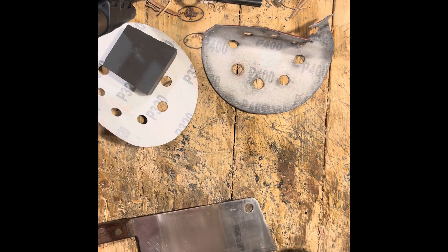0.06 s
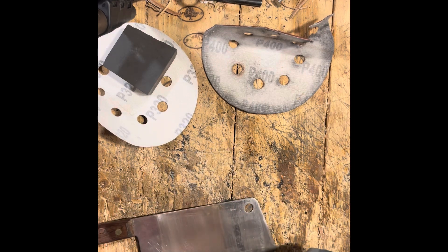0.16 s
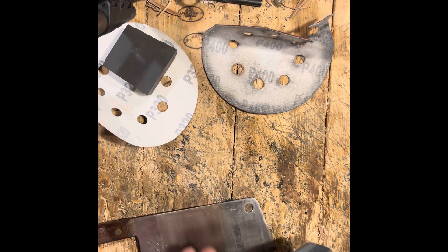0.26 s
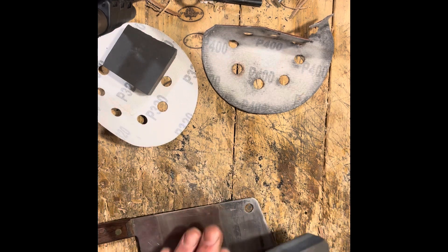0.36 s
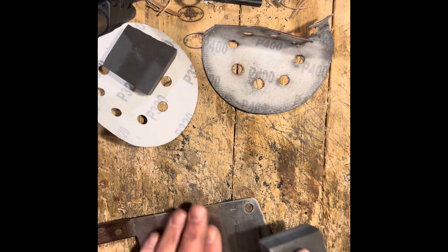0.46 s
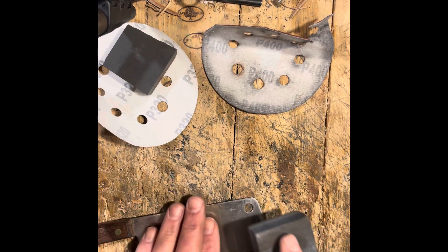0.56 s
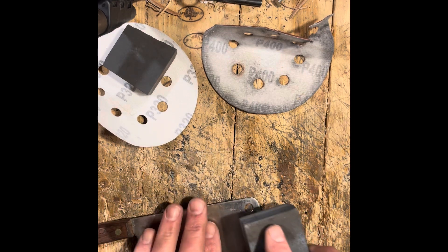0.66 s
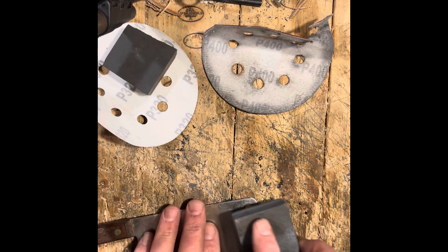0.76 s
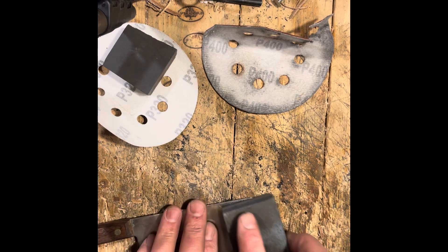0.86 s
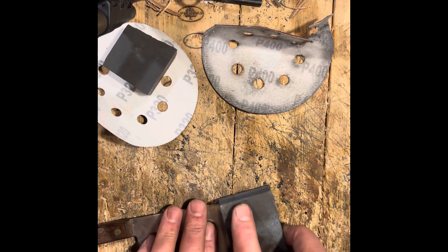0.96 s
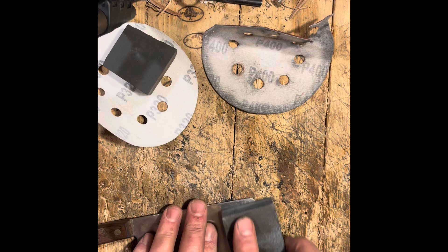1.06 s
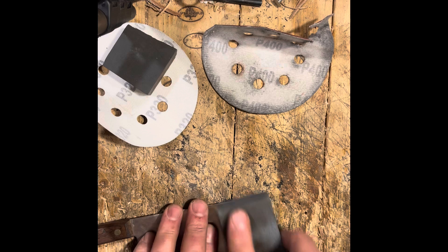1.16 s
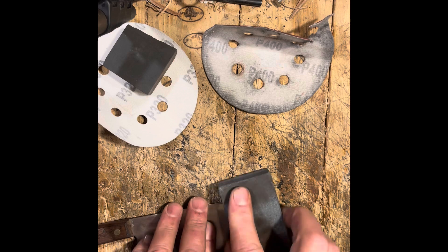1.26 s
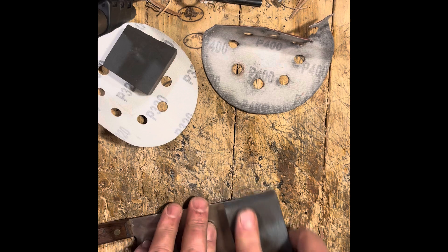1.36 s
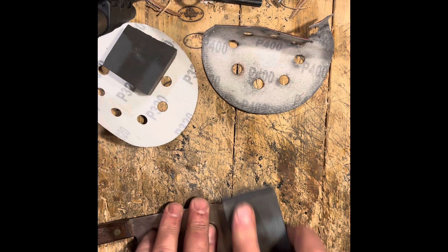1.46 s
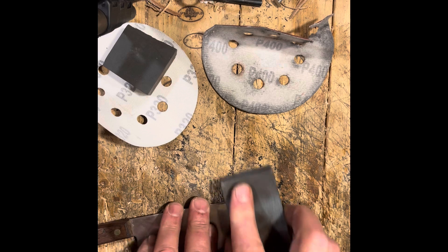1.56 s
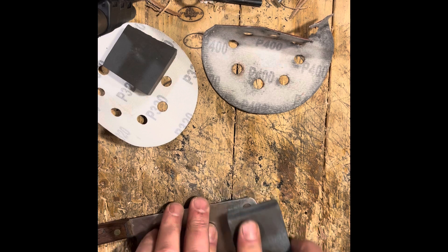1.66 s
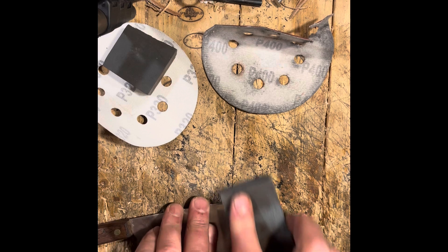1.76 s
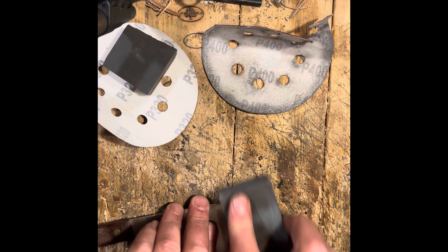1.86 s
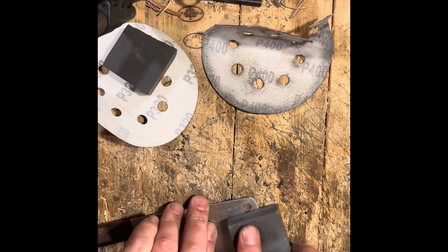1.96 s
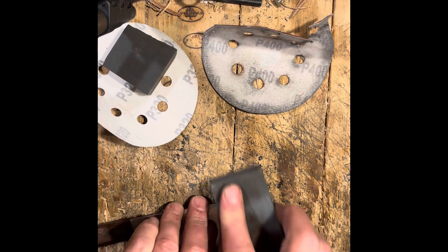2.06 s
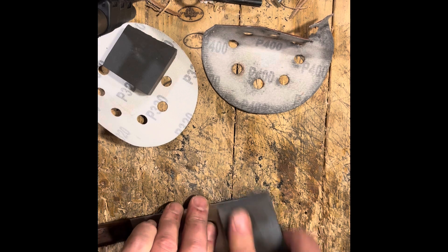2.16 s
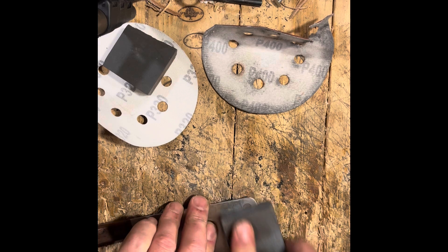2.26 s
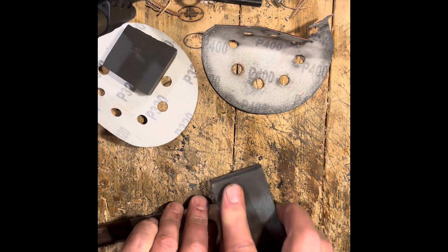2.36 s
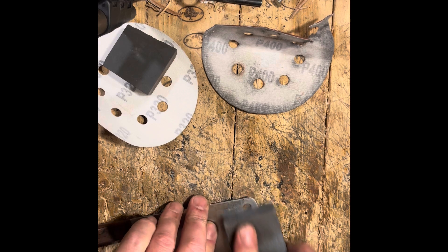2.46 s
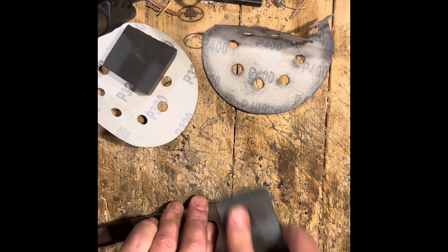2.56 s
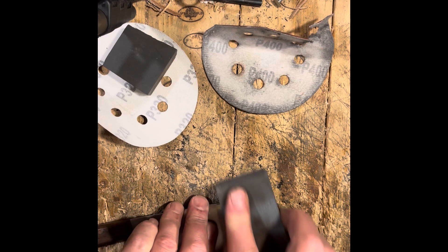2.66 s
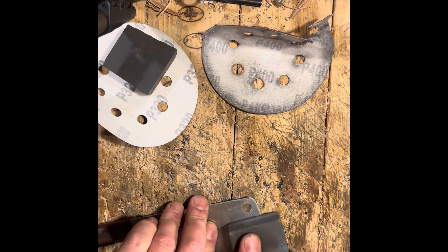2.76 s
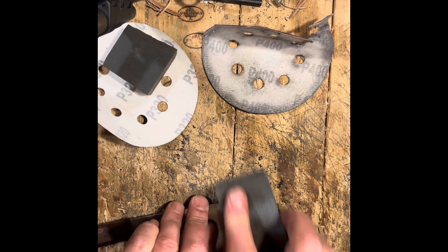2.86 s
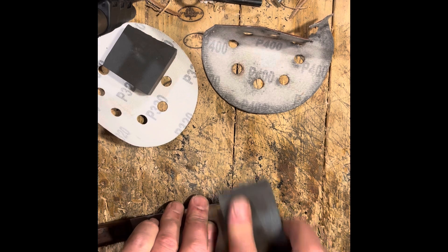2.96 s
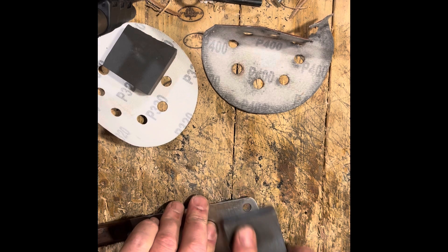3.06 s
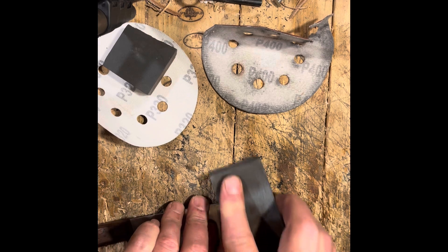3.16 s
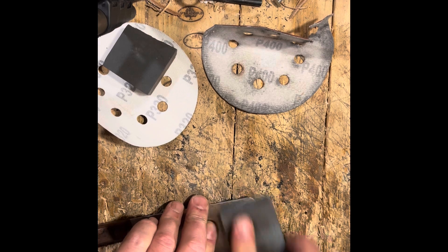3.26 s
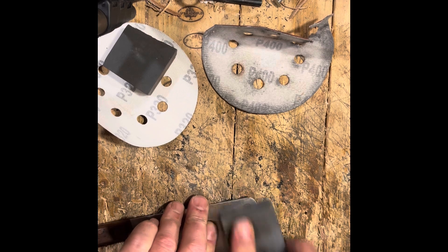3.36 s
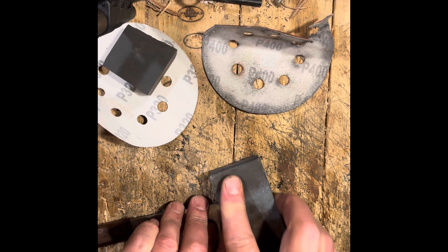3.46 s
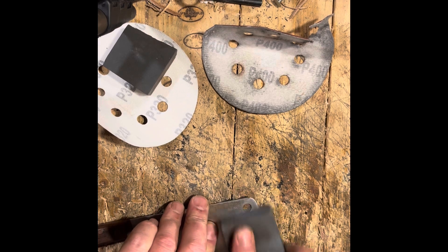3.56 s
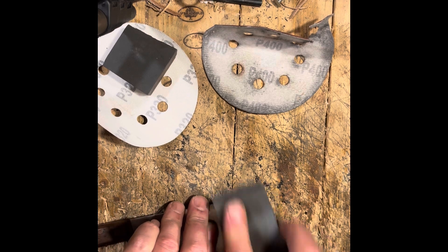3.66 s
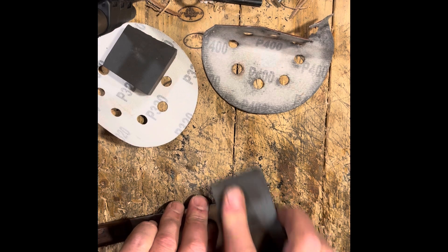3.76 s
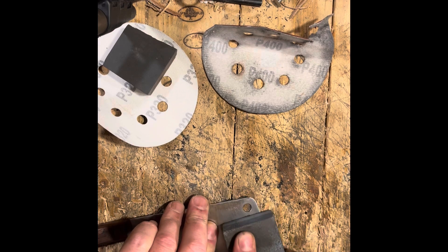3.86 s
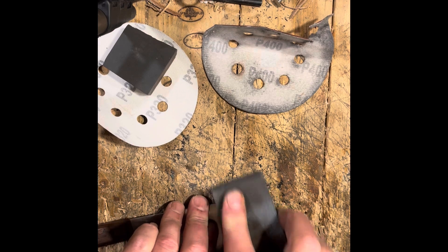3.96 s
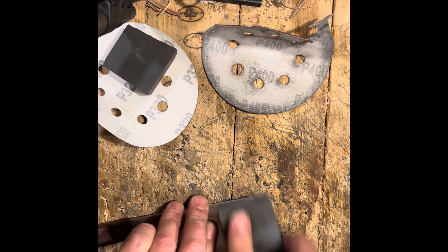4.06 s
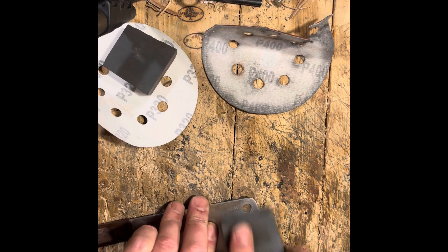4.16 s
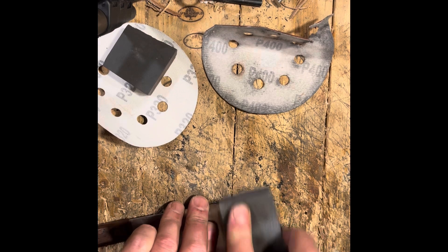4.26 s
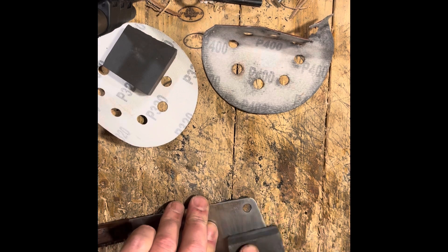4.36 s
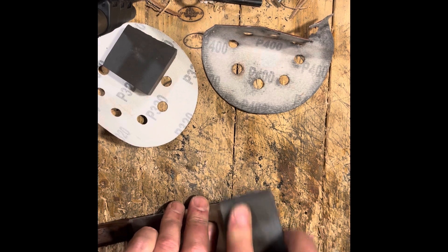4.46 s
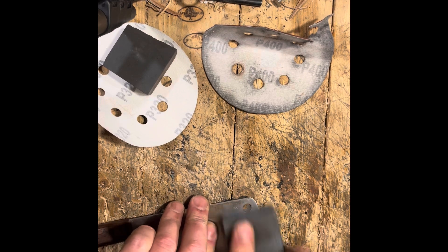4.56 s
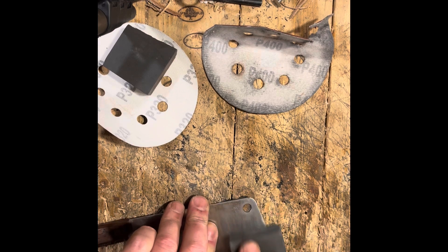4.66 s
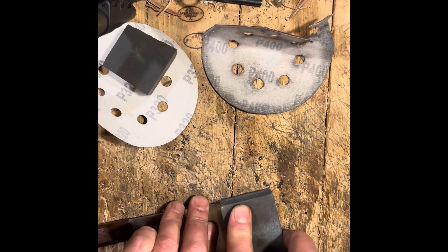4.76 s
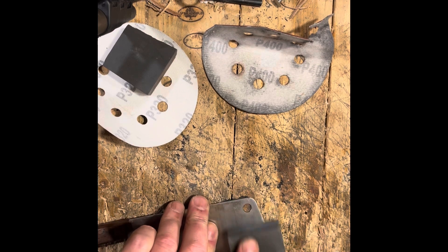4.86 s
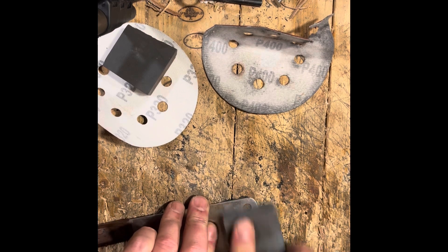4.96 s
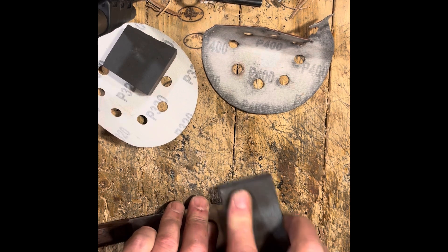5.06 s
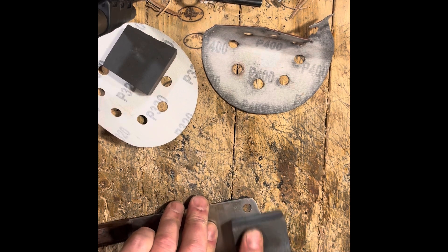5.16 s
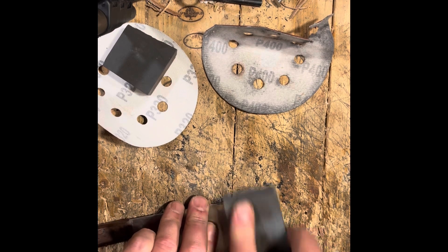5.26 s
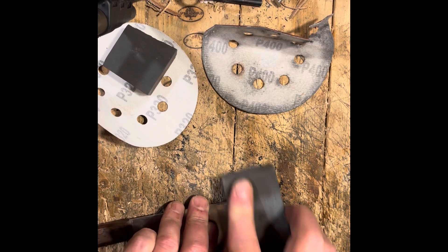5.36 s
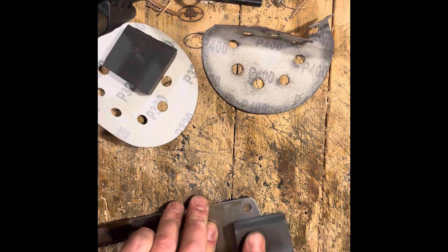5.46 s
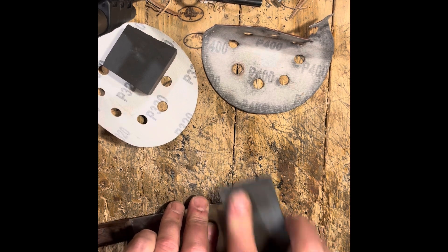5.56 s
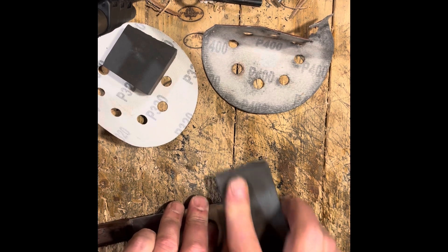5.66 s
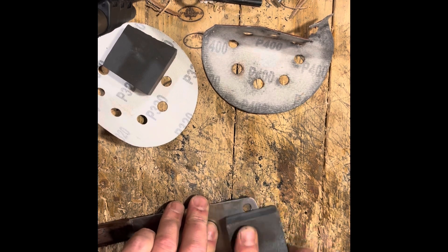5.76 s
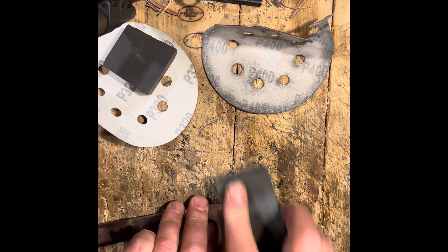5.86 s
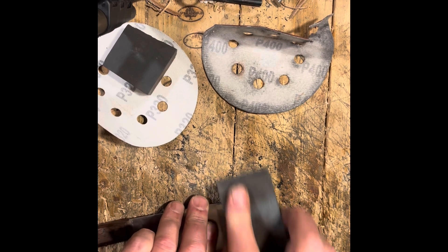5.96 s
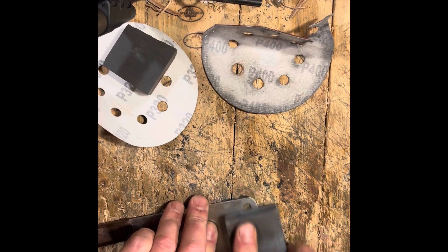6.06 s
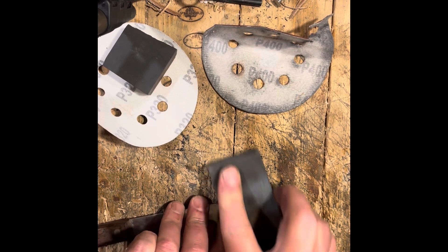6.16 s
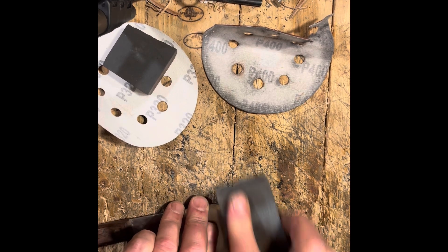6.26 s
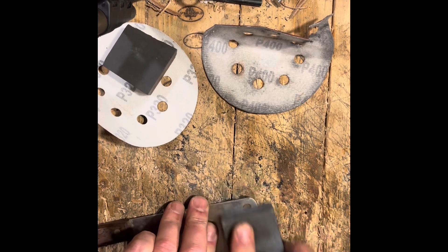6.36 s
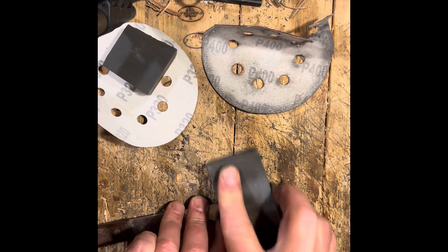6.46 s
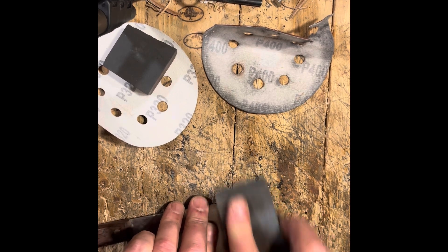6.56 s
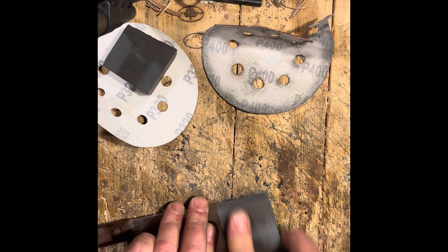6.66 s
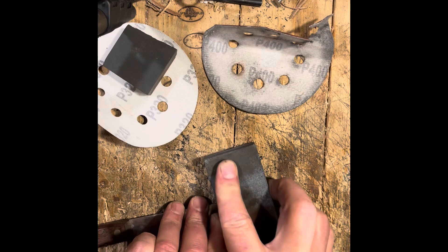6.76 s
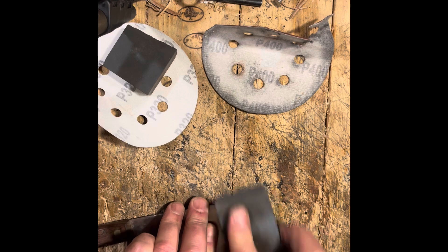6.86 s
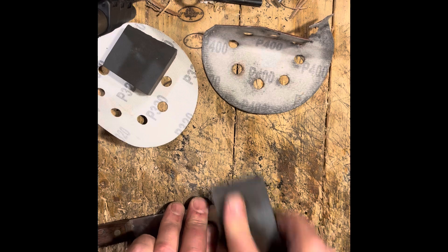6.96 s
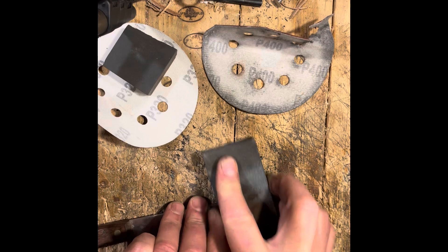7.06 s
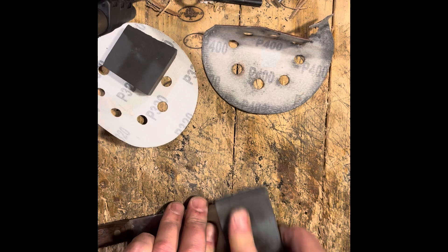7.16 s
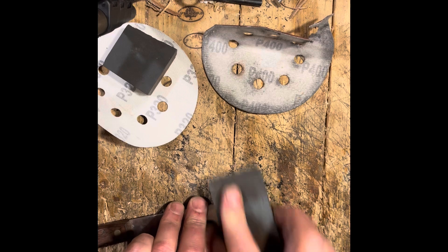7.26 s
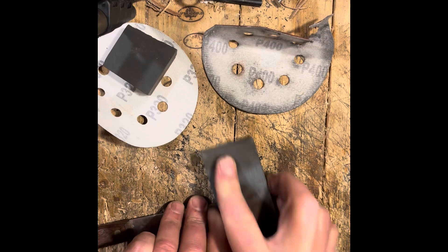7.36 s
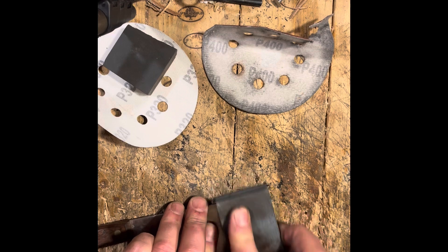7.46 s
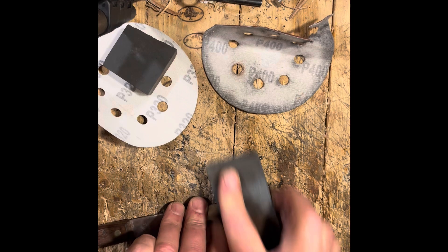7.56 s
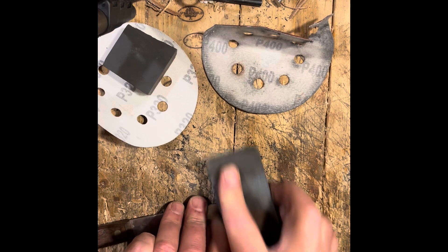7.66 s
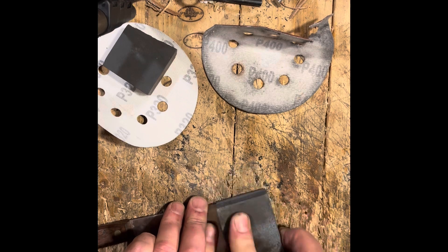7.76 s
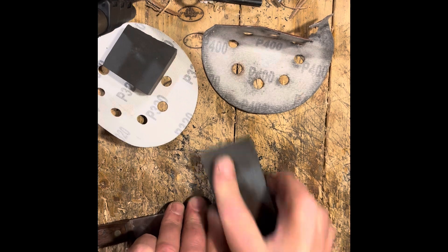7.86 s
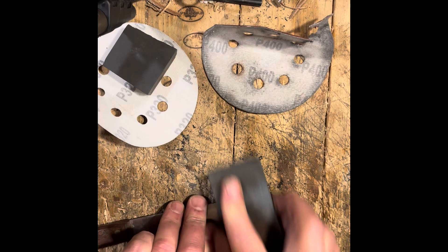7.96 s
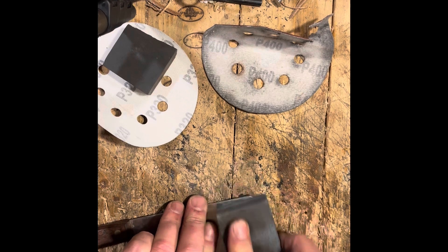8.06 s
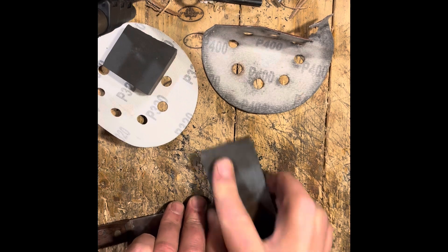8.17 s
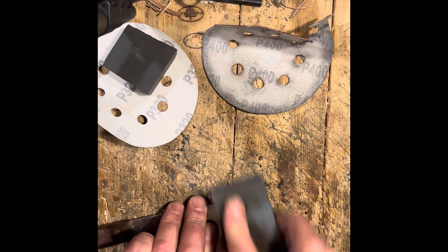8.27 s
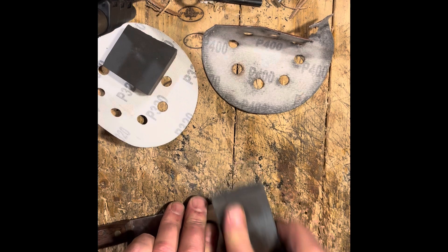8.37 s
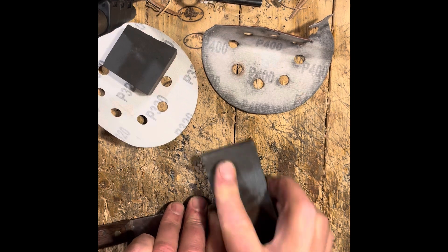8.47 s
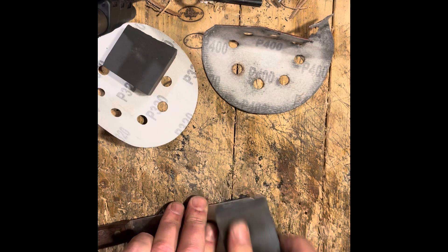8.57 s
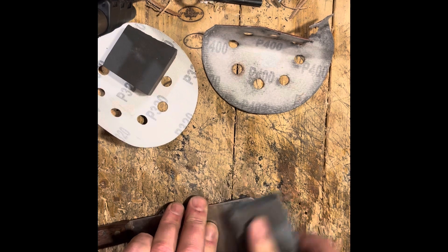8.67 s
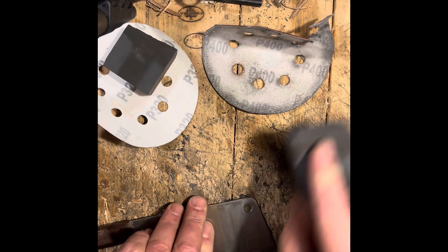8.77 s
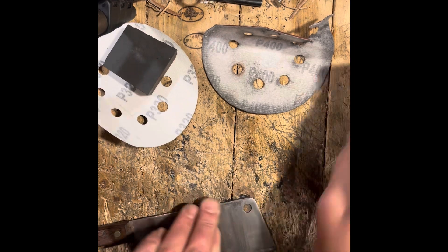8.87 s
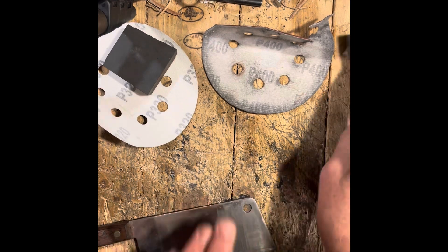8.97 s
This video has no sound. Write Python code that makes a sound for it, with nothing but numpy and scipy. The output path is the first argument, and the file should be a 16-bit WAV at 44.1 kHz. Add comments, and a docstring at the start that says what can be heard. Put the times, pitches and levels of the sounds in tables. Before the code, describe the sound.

In a quiet workshop, a faint far tap rings, then soft handling and a brush of skin. A gritty stone clacks onto a steel blade and scrubs quickly back and forth, hissing with every stroke over a dull bench rumble, with scattered clinks and ticks. The stone lifts, there is a short quiet gap, then skin slides and it lands with a hard wooden clunk. Close stereo phone pickup, dry room.

```python
"""Heard close above a wooden workbench, in two channels, as by a phone: first a far tap rings in the shop,
then light contacts and a slide of skin. A gritty stone is rubbed to and fro on a steel blade that lies on the bench:
grit hisses with the speed of each stroke, the blade rings, rocks and knocks, bright ticks fall, the bench rumbles.
At the end the stone leaves the blade, skin slides and the stone is put down hard. Quiet shop air lies beneath.
Grit is random slips, steel and wood are decaying modes or resonances, the rest is shaped noise."""
import sys
import numpy as np
from scipy import signal
from scipy.fft import rfft, irfft, next_fast_len
from scipy.io import wavfile
from scipy.ndimage import uniform_filter1d, map_coordinates

SR = 44100
rng = np.random.default_rng(int(sys.argv[2]) if len(sys.argv) > 2 else 0)


def generate_wav(sig):
    """Save sig (samples, or channels by samples) to the path in sys.argv[1] as 16-bit PCM at SR."""
    pcm = np.round(np.clip(np.atleast_2d(sig).T, -1, 1) * 32767).astype(np.int16)
    wavfile.write(sys.argv[1], SR, pcm)


N = 398223

# Levels in the tables are relative: each source adds its own gain.
# The strokes of the stone. Each row: turn in seconds, share of the stroke before top speed (held to 0.2-0.8),
# top hiss in dB, rising and falling shoulder in dB re that top, blade ring in dB, bench in dB.
STROKES = [(0.848, 0.17, -36, 9, 0.5, -41, -36), (0.942, 0.15, -30.5, -4, -6, -36.5, -50),
           (1.077, 0.43, -26.5, -5, -7, -34, -45.5), (1.242, 0.52, -29.5, -6.5, -9, -37, -50.5),
           (1.392, 1, -31.5, -5, -4, -35.5, -49.5), (1.518, 0.35, -32, -6, -7.5, -36.5, -45.5),
           (1.667, 0.67, -33.5, -8, -14, -40.5, -49.5), (1.795, 0.25, -30.5, -10, -9, -36.5, -44),
           (1.936, 0.55, -29.5, -9.5, -4.5, -37.5, -41), (2.069, 0.58, -28.5, -4, -7, -36, -42.5),
           (2.203, 0.73, -31.5, -5.5, -9, -38.5, -43), (2.342, 0.24, -30.5, -5.0, -3.5, -39, -42),
           (2.474, 0.67, -31.5, -9.5, -5, -38.5, -41), (2.613, 0.35, -30, -6.5, -8.5, -37.5, -43.5),
           (2.747, 0.6, -32, -9, -7.5, -36, -41), (2.888, 0.21, -29.5, -9, -8, -35.5, -41),
           (3.019, 0.58, -32, -6.5, -11.5, -36, -47), (3.157, 0.27, -29.5, -12.5, -6.5, -36, -40),
           (3.301, 0.66, -31.5, -3.5, -8.0, -38, -37), (3.439, 0.37, -30.5, -4.5, -8, -36.5, -39),
           (3.574, 0.64, -34, -4, -8.5, -38, -40), (3.711, 0.28, -30, -4.5, -6.5, -38.5, -43.5),
           (3.843, 1, -36.5, -2, -3, -38.5, -46), (3.976, 0.2, -29.5, -9, -10, -35.5, -43.5),
           (4.124, 0.87, -38.5, -3.5, -3, -44, -54), (4.255, 0.53, -34, -2.5, -5, -43.5, -51),
           (4.38, 1, -42.5, -5.5, -6, -46, -61), (4.515, 0.5, -36, -5, -5.5, -42, -54),
           (4.656, 0.84, -40.5, -5, -6, -45, -55), (4.785, 0.62, -35.5, -3.5, -5, -43, -47.5),
           (4.913, 0.67, -34, -7.5, -4, -40.5, -46), (5.063, 0.18, -34.5, 1.5, -8, -41, -43),
           (5.201, 0.68, -35, -7.5, -9, -41, -42.5), (5.354, 0.3, -32.5, -15, -9.5, -38, -46.5),
           (5.492, 0.58, -33, -11, -5.5, -42, -45), (5.642, 0.47, -32.5, -7.5, -7, -37.5, -43),
           (5.789, 0.65, -32, -8.5, -14, -36, -40), (5.922, 0.51, -32, -10, -4.5, -39, -41),
           (6.064, 0.45, -33.5, -7.5, -8, -37.5, -41.5), (6.207, 0.35, -30.5, -6.5, -5.5, -37, -41.5),
           (6.359, 0.63, -32, -7.5, -7, -36, -46), (6.501, 0.48, -30, -8, -9, -36.5, -39),
           (6.644, 0.51, -32.5, -6, -8.5, -37, -44), (6.783, 0.47, -30.5, -14, -6.5, -37, -40.5),
           (6.924, 0.48, -32, -6, -8.5, -37, -42), (7.063, 0.58, -32.5, -4, -4.5, -38, -43.5),
           (7.214, 0.46, -34, -3.5, -5.5, -39.5, -45), (7.362, 1, -34, -0.5, -6.5, -42.5, -43.5),
           (7.502, 0.34, -34, -6.5, -3, -38.5, -41.5), (7.634, 0.63, -32.5, -4, -10, -39.5, -40.5),
           (7.785, 0.43, -33.5, -3, -5.5, -38, -45), (7.915, 0.72, -32, -2.5, -3, -38.5, -44),
           (8.062, 0.64, -35, -1, -5, -39.5, -44), (8.199, 0.7, -32.5, -6, -5.5, -39.5, -43),
           (8.339, 0.47, -34, -5.5, -12, -38.5, -41.5), (8.474, 0.5, -32, -5, -3.5, -38.5, -42.5),
           (8.626, 0.34, -37, -1, -5, -44, -62)]
# Coarse grains catch less as the surfaces wear in. Each row: time in seconds, catch size in dB re steady grit.
COARSE_GRIT = [(.85, -4), (2.5, -9), (8.7, -9)]
# Colour of the hissing grit. Each row: frequency in Hz, level in dB.
HISS_COLOUR = [(1000, -30), (2500, -15), (5000, -9), (7000, -5), (7800, -7), (8600, -5), (9200, 1),
               (9800, -5), (10400, -3), (11500, -9), (12600, -20), (13800, -39), (16000, -54)]
# Resonances of the rubbed blade. Each row: frequency in Hz, width in Hz, level in dB.
BLADE_RESONANCES = [(450, 234, -2.5), (554, 138, 3), (902, 167, 8), (931, 59, 10), (1170, 43, -19),
                    (1472, 82, 1.5), (1718, 130, 0), (2130, 226, 0), (2553, 390, 2.5), (2884, 790, -1)]
LIFT_S = 8.667  # the stone leaves the blade
TURN_DB, HALT_DB = -55, -17.5  # re the stroke's top: at a turn, and as the stone halts just before it
RISEN, BRAKES, HALTS = 0.16, 0.85, 0.96  # shares of a stroke: first shoulder, second shoulder, halt
CATCH_S = 0.0036  # time scale in which a caught grain tears loose
BRIGHTENS, TREBLE_HZ = 1.41, 9900  # hiss above this pitch grows with this power of the speed

# Steel or stone meets wood. Each row: time in seconds, clink in dB, thud and knock in dB re the clink.
KNOCKS = [(0.514, -54, 7.5, 4), (0.661, -49, 6, 1.5), (.689, -51.5, 11, -5), (0.8497, -18, 0, -4.5),
          (0.8582, -35, 2, -3), (1.1887, -22.5, -1, -9), (2.4236, -20, -34, -41), (2.43, -22, -30, -30),
          (2.7552, -23, 1, -7.5), (3.097, -38, 10, 1), (3.165, -24.5, 5.5, -8), (3.3063, -18, -5.5, -5.5),
          (3.3267, -26.5, 8.5, 4.5), (3.7423, -30, 2.5, -19), (3.9971, -23.5, -10, -20),
          (4.2072, -22, -5.5, -13), (4.284, -18.5, -9, -14.5), (4.469, -35, 10.5, -3),
          (4.5416, -17.5, -6.5, -6.5), (4.751, -30.5, 0, -9), (4.7894, -20, -6.5, -12),
          (5.5021, -12.5, -9, -16), (5.524, -20, -4.5, -14), (5.5968, -33, 6.5, -14),
          (5.9316, -23, -1.5, -14), (6.1467, -26.5, 1.5, -9), (6.4432, -23, -2, -12),
          (6.717, -35.5, 6.5, 2), (6.7919, -18, 0.5, -7.5), (7.3646, -34.5, 7, 1), (7.7772, -24.5, 0, 3),
          (7.8796, -29.5, 6, -2.5), (7.919, -24.5, -14, -17), (8.0709, -14.5, -5.5, -1),
          (8.208, -22.5, 1, -11), (8.902, -56, 10.5, -5), (8.9457, -27, 18.5, 8.5),
          (8.9603, -17, 18.5, 5.5), (8.973, -13.5, -10, 1.5), (8.9804, -14, -15, -4),
          (8.9947, -19.5, -18, -11), (9.0168, -22, 2, 7)]
# Bright ticks, some on top of a knock. Each row: time in seconds, level in dB.
BRIGHT_TICKS = [(0.554, -34), (0.8742, -12), (0.9555, -22), (0.9614, -17.5), (1.1335, -19), (1.459, -19),
                (1.524, -31), (1.547, -24), (1.8103, -29), (3.3065, -18.5), (3.993, -34), (4.0104, -19),
                (4.2833, -24.5), (4.54, -27), (5.077, -28), (5.38, -27), (5.395, -21), (6.7912, -23),
                (8.6005, -18)]
# Modes of the struck steel. Each row: frequency in Hz, level in dB, t60 in seconds.
CLINK_MODES = [(1450, -6, .02), (1745, -4, .022), (2060, 0, .025), (2400, -3, .02), (2950, -4, .02),
               (3600, -4, .018)]
# Low, then higher modes of blade and bench top. Each row: frequency in Hz, level in dB, free t60 in seconds.
THUD_MODES = [(169, -0.5, 0.11), (190.6, 0, 0.081), (248.3, 1, 0.085), (313, -3, 0.073), (390, -9, 0.11),
              (455, -16.5, 0.14)]
KNOCK_MODES = [(589, -3.5, 0.06), (632, -4, 0.062), (779, 0, 0.03), (964, -9, 0.051), (1036, -4, 0.014),
               (1220, -17.5, 0.036)]
# The same for the bench top under the loose stone. Each row: frequency in Hz, level in dB, t60 in seconds.
LANDING_THUD_MODES = [(165, 0, .14), (219, -1, .065), (290, -3, .055), (345, -7, .05), (430, -12, .05)]
LANDING_KNOCK_MODES = [(540, -9, .04), (600, -4, .045), (662, 0, .06), (790, -7, .045), (905, -9, .05),
                       (1050, -9, .05), (1190, -12, .05)]
KNOCK_TICK_DB = -18  # the tick of a knock re its clink
TICK_CLINK_DB = -6.5  # how much a bright tick rings the steel, re the tick
HELD = 0.32  # share of the ring time left while the hands press the blade
THUD_RISE_S = 0.0025  # the heavy bench top takes a while to swing
ROCK_DB, ROCK_SCATTER_DB, ROCK_EARLY_S = -38, 3, 0.006  # blade tips at a turn: mean peak, spread, lead on the turn

# Low rumble of the bench under the strokes and at the landing. Each row: time in seconds, level in dB.
RUMBLE_LEVEL = [(0, -75), (.84, -71), (.86, -52.5), (.93, -41), (1.0, -62), (2.1, -55), (3.35, -47),
                (3.9, -54), (5.45, -54), (5.56, -45.5), (5.7, -52.5), (7.3, -54), (8.2, -49.5), (8.63, -58),
                (8.7, -69), (8.94, -63), (8.97, -42)]
# Colour of that rumble. Each row: frequency in Hz, level in dB.
RUMBLE_COLOUR = [(20, -43), (45, -2), (80, 2.5), (115, 0.5), (150, -9), (300, -64)]
# Drone of the bench top under the stone. Each row: frequency in Hz, level in dB.
BOARD_COLOUR = [(100, -47), (170, -18.5), (250, 0.5), (330, -12), (390, 2), (470, -20), (700, -59)]

# The far tap. One row: start in seconds, level in dB, pitch in Hz at first, pitch in Hz in the tail,
# width in Hz, t60 of the shop in seconds.
FAR_TAP = (.151, -43, 1830, 1690, 85, 1.2)

# Skin slides on wood or steel. Each row: start in seconds, level in dB, t60 in seconds.
SKIN_SLIDES = [(.775, -53.5, 0.89), (8.899, -41, 0.49), (8.96, -26, 0.1)]
# Colour of skin on wood and steel. Each row: frequency in Hz, level in dB.
SKIN_COLOUR = [(60, -4), (300, 4), (700, 5.5), (2000, 1), (5000, 0), (9000, 10.5), (13000, -12)]
SLIDE_RISE_S = 0.0057
# The quiet air of the shop. Each row: time in seconds, level in dB.
AIR_LEVEL = [(0, -81), (.05, -61.5), (.7, -64.5), (8.675, -59.5), (8.89, -65)]
# Colour of that air. Each row: frequency in Hz, level in dB.
AIR_COLOUR = [(20, 4), (100, 8), (220, 8.5), (450, 11.5), (900, 2), (1700, 6), (3500, 0), (8000, 1.5),
              (10000, 10.5), (11500, -17), (13000, -36)]

# Phase between left and right channels, by frequency. Each row: frequency in Hz, lead of the left in radians.
CHANNEL_LEAD = [(0, 0), (600, .5), (860, 1.2), (1380, .2), (2240, 0), (2580, 1), (3960, .6), (4570, 1.9),
                (5250, 5.4), (6200, 6.3), (8350, 9.3), (9560, 9.5), (11800, 12.5), (15800, 14.6)]
# Level between the channels. Each row: frequency in Hz, left minus right in dB.
CHANNEL_LEAN = [(60, -1.5), (160, -3), (280, -6), (720, -5), (900, 2), (1360, 0), (2200, 0), (2800, -2.5),
                (5700, 0)]
# How alike the channels are. Each row: frequency in Hz, likeness from 0 to 1.
CHANNEL_LIKENESS = [(300, .99), (700, .88), (3000, .86), (5000, .88), (9000, .97)]
TOP_HZ = 15750  # band limit


def strokes():
    """The stone speeds up and slows between turns; hiss and blade ring follow, roughened by catching grains."""
    top_db, blade_db = np.transpose(STROKES)[[2, 5]]
    size = amp(curve(COARSE_GRIT))
    rough = (1 + size * catches()) / np.sqrt(1 + size + size ** 2)

    steady = coloured(grit(spread_db=-0.5, patchy_db=2.5), HISS_COLOUR)
    squeal = unit(resonant(grit(spread_db=4.5, patchy_db=6), [(7850, 640, 0)]))  # coarse grit rings the stone
    hiss = amp(-2.5 + 1.25 * wobble(40)) * (steady + 1.05 * size * squeal)
    treble = filtered(hiss, lambda hz: 1 / (1 + (TREBLE_HZ / (hz + 1)) ** 16))
    speed = np.clip(sweep(0 * top_db), 0, 1)
    hiss = hiss + (1.14 * speed ** (BRIGHTENS - 1) - 1) * treble

    blade = unit(resonant(grit(spread_db=-0.5, patchy_db=2.5), BLADE_RESONANCES))
    ring_gain = uniform_filter1d(sweep(blade_db), size=700)  # the steel rings on across the turns
    ring = amp(0.49 * wobble(30)) * ring_gain * rough ** 0.54 * blade
    return sweep(top_db) * rough * hiss + ring


def sweep(top_db):
    """Gain that rises and falls with the speed of the stone, reaching top_db in each stroke."""
    turn, share, _, rising_db, falling_db, *_ = np.transpose(STROKES)
    span = np.diff(turn, append=LIFT_S)
    share = np.clip(share, .2, .8)
    times = np.array([turn, turn + RISEN * span, turn + share * span, turn + BRAKES * span, turn + HALTS * span])
    flat = 0 * turn
    levels = amp(top_db + np.array([TURN_DB + flat, rising_db, flat, falling_db, HALT_DB + flat]))
    return np.interp(np.arange(N) / SR, times.T.ravel(), levels.T.ravel(), left=0, right=0)


def catches():
    """Quick bursts where a coarse grain catches and tears loose, rms 1."""
    hits = (rng.random(N) < 170 / SR) * rng.gamma(2, size=N).clip(0, 4)  # about 170 a second
    u = np.arange(SR // 50) / SR / CATCH_S
    return unit(signal.fftconvolve(hits, np.sqrt(u) * np.exp(-u))[:N])


def grit(spread_db, patchy_db):
    """Two runs of tiny grain slips of unequal size, in patches of random colour."""
    slips = rng.standard_normal((2, N)) * amp(spread_db * wobble(900))
    spectrum = signal.stft(slips, nperseg=256)[2]
    patches = rng.standard_normal(spectrum.shape[1:])
    patches = uniform_filter1d(patches, size=5, axis=0)  # across frequency
    patches = uniform_filter1d(patches, size=9, axis=1)  # across time
    return signal.istft(spectrum * amp(patchy_db * unit(patches)), nperseg=256)[1][:, :N]


def knocks():
    """Clinks, rattles and ticks of steel, with the knocks and thuds of wood."""
    clinks, rattle, ticks = steel_contacts()
    body = wood_contacts() + clinks
    body = filtered(body[:, :N], lambda hz: (1j * hz / (60 + 1j * hz)) ** 2)  # rolls off deep bass below about 60 Hz
    rattle = resonant(rattle[:, :N], [(900, 760, -2), (2160, 1260, 1.5)])
    norm = np.sqrt(np.mean(amp(along(HISS_COLOUR, np.arange(SR // 2))) ** 2))
    ticks = filtered(ticks[:, :N], lambda hz: amp(along(HISS_COLOUR, hz)) / norm)
    return body + rattle + ticks


def steel_contacts():
    """Each contact rings steel modes with a noisy rattle and a shorter tick; bright ticks ring the steel less."""
    t = np.arange(SR // 5) / SR
    clinks, rattle, ticks = np.zeros((3, 2, N + SR))
    contacts = [(s, db, db + KNOCK_TICK_DB) for s, db, *_ in KNOCKS]
    contacts += [(s, db + TICK_CLINK_DB, db) for s, db in BRIGHT_TICKS]
    for row in range(2):  # the direct sound, then its scattered twin
        for s, db, tick_db in contacts:
            add_at(clinks[row], s, amp(db - 7) * ringing(CLINK_MODES, t, rise=0.00091))
            burst = amp(db - 0.5 - 60 * t / 0.027) * (1 - np.exp(-t / 0.00022))
            add_at(rattle[row], s, burst * rng.standard_normal(len(t)))
            add_at(ticks[row], s, amp(tick_db - 60 * t / 0.011) * rng.standard_normal(len(t)))
    return clinks, rattle, ticks


def wood_contacts():
    """Each contact gives a wooden knock and a lower thud; a small bump of the blade marks each turn after the first."""
    t = np.arange(SR // 5) / SR
    body = np.zeros((2, N + SR))
    held_knock, held_rock = held(KNOCK_MODES), held(THUD_MODES + KNOCK_MODES[:3])
    for row in range(2):  # the direct sound, then its scattered twin
        for s, db, thud_db, knock_db in KNOCKS:
            if s < LIFT_S:
                thud, knock, rise = THUD_MODES, held_knock, THUD_RISE_S
            else:
                thud, knock, rise = LANDING_THUD_MODES, LANDING_KNOCK_MODES, .0008
            add_at(body[row], s, amp(db + thud_db) * ringing(thud, t, rise))
            add_at(body[row], s, amp(db + knock_db + 4.5) * ringing(knock, t, rise=0.00035))
        for s, *_ in STROKES[1:]:
            rock_db = ROCK_DB + ROCK_SCATTER_DB * rng.standard_normal()
            add_at(body[row], s - ROCK_EARLY_S, amp(rock_db) * ringing(held_rock, t, rise=0.0006))
    return body


def held(modes):
    """Modes whose ring is shortened by the pressing hands."""
    return [(hz, db, t60 * HELD) for hz, db, t60 in modes]


def ringing(modes, t, rise):
    """Modes struck at new strengths and slightly new pitches, peak 1."""
    hz, db, t60 = np.transpose(modes)[:, :, None]
    strength_db = 2.5 * rng.standard_normal((len(modes), 1))
    detune = .015 * rng.standard_normal((len(modes), 1))
    waves = amp(db + strength_db - 60 * t / t60) * np.sin(2 * np.pi * hz * (1 + detune) * t)
    waves[1::2] *= -1  # neighbours push against each other, so little spills below the lowest
    ring = waves.sum(axis=0) * (1 - np.exp(-t / rise))
    return ring / np.abs(ring).max()


def add_at(track, s, sound):
    """Lay a sound into a track from s seconds on."""
    start = round(s * SR)
    track[start:start + len(sound)] += sound


def bench():
    """The bench top thumps and drones under each stroke, over a low rumble that swells again at the landing."""
    bumps = (rng.random(N) < 160 / SR) * amp(2.5 * rng.exponential(size=N).clip(0, 3))  # about 160 a second
    bumps = bumps * rng.choice([-1, 1], (2, N))
    modes = THUD_MODES + KNOCK_MODES[:2]
    thumps = resonant(bumps, [(hz, 2.24 / t60, db) for hz, db, t60 in modes])  # width in Hz from t60
    thumps = unit(filtered(thumps, lambda hz: 1 / (1 + 1j * hz / 420) ** 2))  # soft contact
    drone, rumble = uneven_noise(BOARD_COLOUR), uneven_noise(RUMBLE_COLOUR)
    push = uniform_filter1d(sweep(np.transpose(STROKES)[6]), size=2000)
    push = push * (np.arange(N) > STROKES[0][0] * SR)
    return push * (amp(0.5) * thumps + amp(-0.5) * drone) + amp(curve(RUMBLE_LEVEL) - 1.0) * rumble


def uneven_noise(colour):
    """Coloured noise of wavering strength, rms 1."""
    return coloured(amp(3.55 * wobble(20)) * rng.standard_normal((2, N)), colour)


def shop(x):
    """Bench top and near walls answer with a short, dull tail."""
    t = np.arange(SR // 5) / SR
    tail = uniform_filter1d(rng.standard_normal((2, len(t))), size=5) * amp(-60 * t / .12) * (t > .003)
    return signal.fftconvolve(x, tail / np.linalg.norm(tail[0]), axes=1)[:, :N]


def tap():
    """A far tap on one resonance: a quick blow, then the shop's answer, which sinks in pitch."""
    s, db, first_hz, tail_hz, width_hz, t60 = FAR_TAP
    t = np.clip(np.arange(N) / SR - s, 0, None)
    blow = 7 * amp(-60 * t / 0.014) * np.sin(2 * np.pi * first_hz * t)
    early = 0.33 * amp(-150 * t / t60) * noise_band(first_hz, 4.7 * width_hz)
    pitch = tail_hz + (first_hz - tail_hz) * np.exp(-t / .08)
    ring = (1 + noise_band(0, width_hz)) * np.sin(2 * np.pi * np.cumsum(pitch) / SR)
    tail = 0.29 * amp(-60 * t / t60) * (1 - t / .27).clip(0) ** 0.14 * ring  # silent 0.27 s after the blow
    tone = amp(db) * (1 - np.exp(-t / .0015)) * ([[1], [0]] * blow + early + tail)
    middle, side = tone
    return np.array([middle + .5 * side, middle - .5 * side])


def noise_band(hz, wide):
    """Two noises in a bell-shaped band around hz, rms 1."""
    return unit(filtered(rng.standard_normal((2, N)), lambda f: np.exp(-((f - hz) / wide) ** 2)))


def skin():
    """Skin slides on wood and steel: grainy noise that starts quickly and dies away."""
    gain = np.zeros(N)
    for s, db, t60 in SKIN_SLIDES:
        t = np.clip(np.arange(N) / SR - s, 0, None)
        gain += amp(db - 60 * t / t60) * np.clip(t / SLIDE_RISE_S, 0, 1)
    return gain * coloured(grit(spread_db=2.0, patchy_db=2.0), SKIN_COLOUR)


def air():
    """Quiet shop air: patchy coloured noise at a level that fades in quickly, then drifts."""
    return amp(curve(AIR_LEVEL)) * coloured(grit(spread_db=2.0, patchy_db=2.0), AIR_COLOUR)


def channels(pair):
    """The first row reaches both channels, with a lead and a lean; the second, scattered sound, differs in sign."""
    def mix(hz, side):
        turn = np.arccos(np.clip(along(CHANNEL_LIKENESS, hz), 0, 1)) / 2
        lead = np.exp(.5j * side * np.interp(hz, *np.transpose(CHANNEL_LEAD)))
        path = amp(side * along(CHANNEL_LEAN, hz) / 2) * lead
        return path * np.array([np.cos(turn), side * np.sin(turn)])
    return np.array([filtered(pair, lambda hz: mix(hz, side)).sum(axis=0) for side in (1, -1)])


def amp(db):
    """Gain of a level in dB."""
    return 10 ** (np.asarray(db) / 20)


def unit(x):
    """x at rms 1."""
    return x / np.sqrt(np.mean(x ** 2) + 1e-20)


def along(points, hz):
    """(Hz, value) points read on a log frequency axis."""
    f, v = np.transpose(points)
    return np.interp(np.log(hz + 1), np.log(f + 1), v)


def curve(rows):
    """One value per sample from (s, value) rows."""
    return np.interp(np.arange(N) / SR, *np.transpose(rows))


def wobble(rate):
    """A smooth random curve, rate knots a second."""
    return map_coordinates(rng.standard_normal(int(N * rate / SR) + 4), [np.arange(N) * rate / SR])


def filtered(x, response):
    """x with its spectrum times a complex response of frequency."""
    m = next_fast_len(N + SR // 2)
    return irfft(rfft(x, m) * response(np.fft.rfftfreq(m, 1 / SR)), m)[..., :N]


def coloured(x, colour):
    """x shaped by (Hz, dB) points, rms 1."""
    return unit(filtered(x, lambda hz: amp(along(colour, hz))))


def resonant(x, peaks):
    """x through (Hz, width in Hz, dB) resonances of alternating sign."""
    def response(f):
        return sum((-1) ** k * amp(db) * 1j * f * width / (hz * hz - f * f + 1j * f * width)
                   for k, (hz, width, db) in enumerate(peaks))
    return filtered(x, response)


def scene():
    """Everything near is spread over two channels; the tap arrives from all sides."""
    blows = knocks()
    near = strokes() + blows + bench() + amp(-12) * shop(blows) + skin() + air()
    return channels(near) + tap()


def record(dry):
    """The loudest blows are rounded off; nothing is kept above the band limit."""
    rounded = dry / (1 + np.abs(dry / .95) ** 4) ** .25
    return filtered(rounded, lambda hz: hz < TOP_HZ)


dry = scene()
out = record(dry)
generate_wav(out)
```